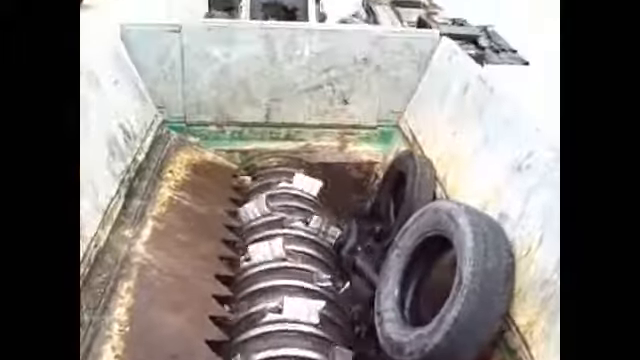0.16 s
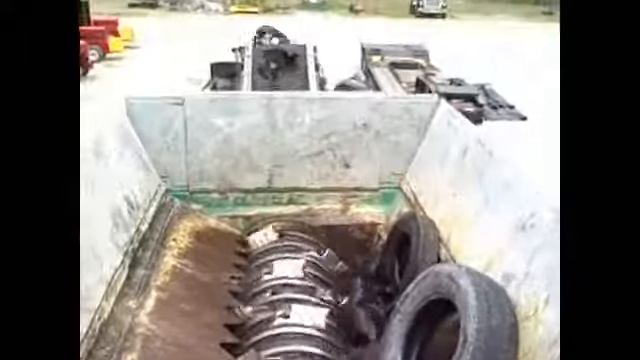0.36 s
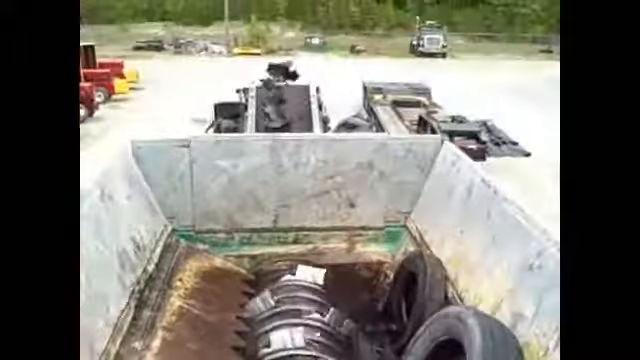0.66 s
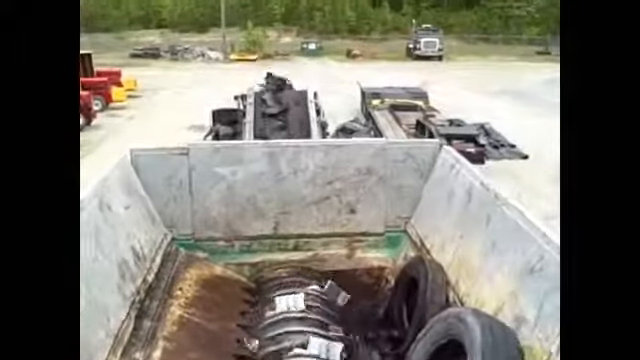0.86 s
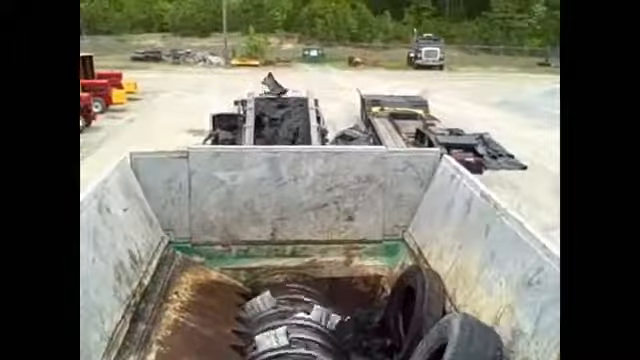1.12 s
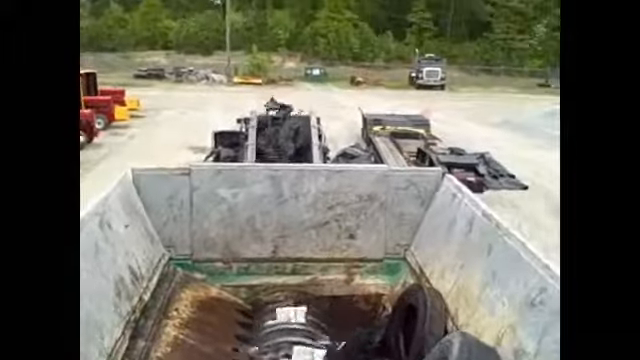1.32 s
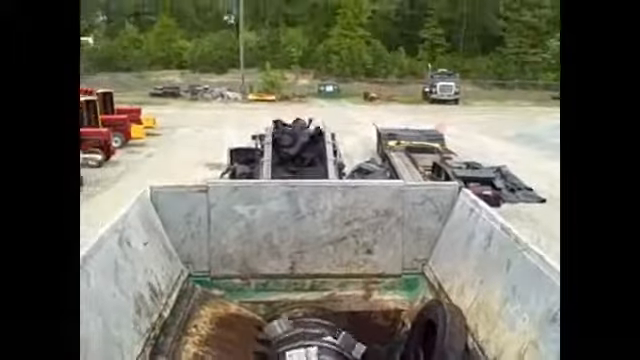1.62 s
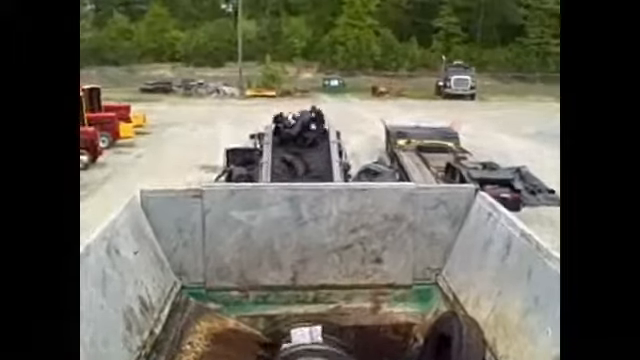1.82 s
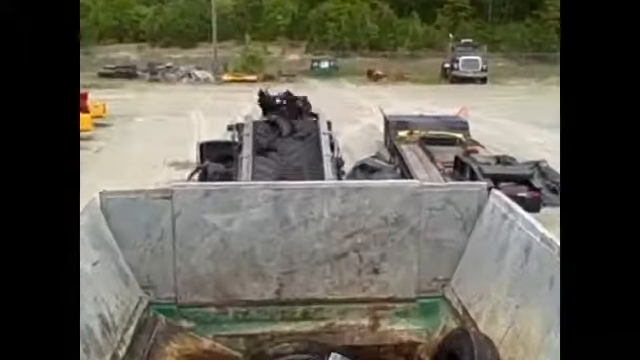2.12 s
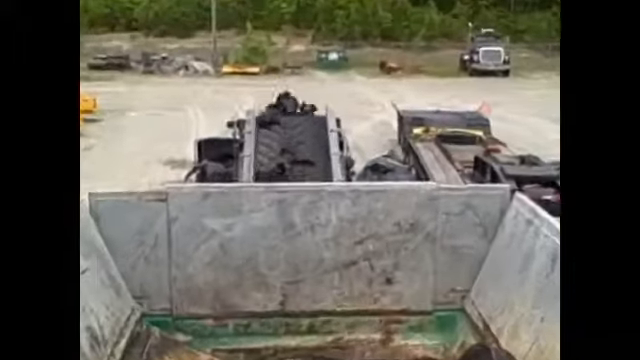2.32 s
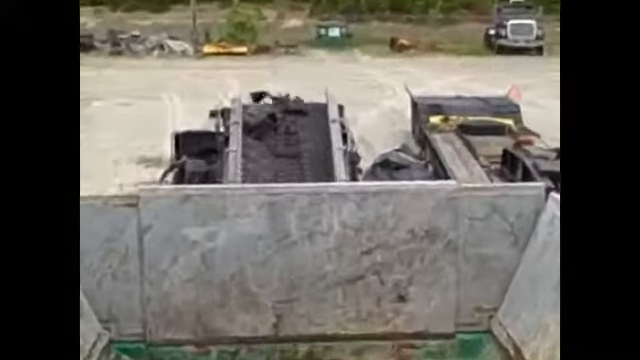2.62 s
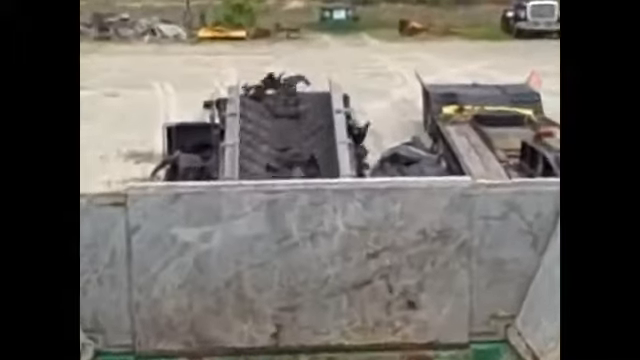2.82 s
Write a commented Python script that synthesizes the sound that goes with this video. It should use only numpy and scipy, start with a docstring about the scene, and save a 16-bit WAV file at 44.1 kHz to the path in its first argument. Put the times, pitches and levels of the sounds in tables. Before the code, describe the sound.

A tyre shredder runs throughout with a low diesel hum, deep rumble, broad fan roar and wavering hydraulic whine. Steel hopper walls knock constantly. Hollow tyre thumps cluster around 0.7 s, recur singly, and thicken at 2.4-2.8 s. Short gritty rubber tears continue, sharper near 1.3 and 2.7 s, with brief squeaks from 1.2 s and wire pings near 2.7 s. Open yard, close mono pickup, slightly overloaded peaks.

```python
"""A low exhaust hum and a broad roar fill an open yard, heard from above a tyre shredder's steel hopper.
The diesel hums on its firing rate, a hydraulic pump whines in two sines, and banded noise makes the
roar of cooling fan and drive and a deep rumble. Random knocks ring the hopper, tyres thump in dying tones
with noise, rubber squeaks and wire pings in narrow noise, and teeth tear rubber in bursts of grit and hiss."""
import sys
import numpy as np
from scipy import signal
from scipy.io import wavfile

SR = 44100
rng = np.random.default_rng(int(sys.argv[2]) if len(sys.argv) > 2 else 0)


def wav_out(sig):
    """Save sig, one row per channel (or a flat mono array), as 16-bit PCM at SR to the path in sys.argv[1]."""
    wavfile.write(sys.argv[1], SR, np.round(np.clip(np.atleast_2d(sig).T, -1, 1) * 32767).astype(np.int16))


N = 130977


def amp(db):
    """Amplitude factor of a level in dB."""
    return 10 ** (np.asarray(db) / 20)


def rms_one(x):
    """Scale a signal to rms 1."""
    return x / np.sqrt(np.mean(x ** 2) + 1e-20)


def in_time(rows):
    """Straight lines between (seconds, value) rows, one value per sample."""
    seconds, value = np.transpose(rows)
    return np.interp(np.arange(N) / SR, seconds, value)


def drift(rate_hz):
    """Slow random wander of spread 1: noise through two equal low-pass poles at rate_hz."""
    step = 40   # samples between computed points
    settle = 2000   # points dropped while the filter settles
    pole = np.exp(-2 * np.pi * rate_hz * step / SR)
    noise = rng.standard_normal(N // step + settle + 2)
    slow = signal.lfilter([1], [1, -2 * pole, pole ** 2], noise)[settle:]
    return np.interp(np.arange(N) / step, np.arange(len(slow)), rms_one(slow - slow.mean()))


def band(x, low_hz, high_hz):
    """Keep what lies between two frequencies."""
    return signal.sosfilt(signal.butter(2, [low_hz, high_hz], "band", fs=SR, output="sos"), x)


def tone(phase, db):
    """A sine at the given rms level, from a random starting phase."""
    return np.sqrt(2) * amp(db) * np.sin(phase + rng.uniform(0, 2 * np.pi))


def grit(rate_per_s, spread_db):
    """Random clicks of uneven size and either sign."""
    size = amp(spread_db * np.minimum(rng.exponential(1, N), 5)) * rng.choice([-1, 1], N)
    return size * (rng.random(N) < rate_per_s / SR)


def banded_noise(spectrum, patchy_db, treble_db=0):
    """Third-octave bands of noise that flicker partly together and partly alone; rms 1."""
    together_share, treble_from_hz = .4, 300
    hz_at, db_at = np.transpose(spectrum)
    octaves = np.log2(hz_at[-1] / hz_at[0])
    edges = hz_at[0] * 2 ** np.arange(0, octaves + .6, 1 / 3)
    together = drift(6.3)
    white = rng.standard_normal((2, N))
    out = 0
    for k, (low, high) in enumerate(zip(edges, edges[1:])):
        hz = np.sqrt(low * high)
        flicker = patchy_db * (together_share * together + drift(13.8))
        db = np.interp(np.log(hz), np.log(hz_at), db_at) + flicker
        db = db + treble_db * hz / (hz + treble_from_hz)   # acts more the higher the band
        out = out + amp(db) * band(white[k % 2], low, high)   # neighbours use separate noises
    return rms_one(out)


def rumble():
    """Deep rumble: low noise whose bands flicker in level."""
    # Each row: frequency in Hz, relative level in dB per Hz.
    spectrum = [(15, -34), (30, 5), (50, 11.5), (80, 2), (125, -14.5), (180, -10)]
    return amp(-33.5) * banded_noise(spectrum, patchy_db=2.0)


def roar():
    """Cooling fan and drive: broad noise whose treble follows the load."""
    # Each row: frequency in Hz, relative level in dB per Hz.
    spectrum = [(74, -8), (125, -5.5), (156, -13), (223, -7), (283, -7), (346, -8), (406, -10), (581, -17),
                (655, -16), (709, -9), (783, -15.5), (1140, -22.5), (1260, -22.5), (1640, -26),
                (2700, -29.5), (7310, -45.5), (14700, -50.5)]
    # Treble of the roar. Each row: time in seconds, level in dB (only departures from the mean count).
    load_rows = [(0, -39.5), (.2, -39.5), (.45, -41), (.65, -38.5), (.9, -41), (1.2, -41.5), (1.35, -39.5),
                 (1.52, -41.5), (1.75, -40), (1.95, -41.5), (2.1, -40.5), (2.22, -42), (2.38, -40),
                 (2.55, -40), (2.65, -40.5), (2.8, -40.5), (2.97, -38.5)]
    load = in_time(load_rows)
    return amp(-22) * banded_noise(spectrum, patchy_db=1.34, treble_db=load - load.mean())


def engine():
    """Exhaust pulses: a sine at the wandering firing rate, and weaker sines at half-order multiples."""
    firing_hz, wander_hz = 104.44, 0.44
    # Exhaust hum. Each row: time in seconds, level in dB before a small random waver.
    hum_rows = [(0.0, -20), (0.22, -17.5), (0.55, -22.5), (0.71, -16), (0.93, -21), (1.1, -18.5),
                (1.67, -20), (1.73, -18), (2.41, -19.5), (2.49, -15), (2.64, -20.5), (2.97, -17.5)]
    # Weaker orders. Each row: multiple of the firing rate, level in dB before a random waver.
    order_rows = [(.5, -46.5), (1.5, -36)]
    phase = 2 * np.pi * np.cumsum(firing_hz + wander_hz * drift(2.1)) / SR
    out = tone(phase, in_time(hum_rows) + 1.04 * drift(36))
    for multiple, db in order_rows:
        out = out + tone(multiple * phase, db + 3.6 * drift(5.3))
    return out


def pump():
    """Piston ripple of the hydraulic pump: two partials, an octave apart, on one wandering speed."""
    wander_hz, low_db = 1.0, -33
    # Each row: time in seconds, pitch of the second partial in Hz before the wander.
    speed_rows = [(0, 722), (.1, 724), (.26, 704), (.45, 724), (.6, 722), (.77, 706), (.95, 728),
                  (1.05, 726), (1.17, 706), (1.35, 720), (1.56, 728), (1.78, 706), (1.92, 723), (2.13, 719),
                  (2.22, 710), (2.4, 729), (2.6, 712), (2.8, 729), (2.97, 724)]
    # Each row: time in seconds, level of the second partial in dB.
    whine_rows = [(0.0, -34), (0.34, -36.5), (0.84, -34), (0.88, -42.5), (1.05, -28), (1.25, -36),
                  (1.31, -31), (1.93, -32), (2.13, -28), (2.17, -39.5), (2.56, -31), (2.77, -49),
                  (2.8, -34), (2.97, -35)]
    phase = 2 * np.pi * np.cumsum(in_time(speed_rows) + wander_hz * drift(20)) / SR
    low_partial = tone(phase / 2, low_db + 1.4 * drift(8.8))
    return low_partial + tone(phase, in_time(whine_rows))


def hopper():
    """Tumbling tyres and the rotor knock the steel walls throughout: random clicks ring dying modes."""
    knocks = grit(rate_per_s=70, spread_db=3.2)
    # Wall modes. Each row: frequency in Hz, relative level in dB, time to fall 60 dB in seconds.
    modes = [(182, 6.5, 0.077), (282, 1, 0.13), (318.5, 2, 0.093), (430, -25.5, 0.071), (516, -6.5, 0.15),
             (1273, -12.5, 0.12)]
    out = 0
    for hz, db, t60 in modes:
        radius, angle = amp(-60 / (t60 * SR)), 2 * np.pi * hz / SR
        strikes = knocks * rng.standard_normal(N)   # each knock excites each mode differently
        ringing = signal.lfilter([0, np.sin(angle)], [1, -2 * radius * np.cos(angle), radius ** 2], strikes)
        out = out + amp(db) * ringing
    return amp(-28) * rms_one(out)


def squeaks():
    """Short squeaks of rubber and pings of wire: narrow noise under a smooth swell."""
    # Each row: start in seconds, rms level at the top of the swell in dB, pitch in Hz, length in seconds.
    squeak_rows = [(1.237, -30, 1530, 0.047), (1.312, -28, 1800, 0.0098), (1.585, -34, 1900, .03),
                   (2.319, -35, 2700, 0.015), (2.691, -22.5, 4620, 0.0046), (2.692, -30, 6160, 0.0044),
                   (2.736, -36, 5100, 0.02), (2.773, -33, 3260, 0.011)]
    out = np.zeros(N)
    for start, db, hz, length in squeak_rows:
        n, first = int(length * SR), int(start * SR)
        rough = rms_one(band(rng.standard_normal(SR // 8), hz * .96, hz * 1.04))
        out[first:first + n] += amp(db) * np.hanning(n) * rough[-n:]
    return out


def thumps():
    """Tyres thump against walls and rotor: hollow booms, each a dying tone with noise around it."""
    attack_s, width = 0.0024, 0.43   # width of the noise as a share of the pitch
    # Each row: start in seconds, level in dB (5 dB is taken off), pitch in Hz, time to fall 60 dB in seconds.
    thump_rows = [(.217, -16, 282, .08), (.342, -18.5, 301, .19), (.573, -18.5, 306, 0.15),
                  (.66, -12, 160, 0.13), (.668, -21, 422, 0.093), (.705, -7, 382, 0.091),
                  (.71, -7.5, 179, 0.23), (.721, -15.5, 314, 0.15), (.735, -15.5, 822, 0.095),
                  (1.01, -13.5, 261, .15), (1.336, -15, 336, 0.15), (1.679, -11, 189, 0.12),
                  (1.932, -8, 314, 0.096), (2.155, -12, 200, .08), (2.388, -12, 180, 0.16),
                  (2.431, -7, 185, .11), (2.45, -11, 300, 0.11), (2.489, -10.5, 293, 0.11),
                  (2.529, -7.5, 280, 0.1), (2.599, -15, 297, .12), (2.73, -8.5, 148, 0.21),
                  (2.804, -10.5, 309, 0.17)]
    t = np.arange(SR // 3) / SR
    out = np.zeros(N + SR)
    for start, db, hz, t60 in thump_rows:
        noise = band(rng.standard_normal(len(t)), hz / (1 + width), hz * (1 + 2 * width))
        body = np.sin(2 * np.pi * hz * t) + .5 * rms_one(noise)
        shape = (1 - np.exp(-t / attack_s)) * amp(-60 * t / t60)
        first = int(start * SR)
        out[first:first + len(t)] += amp(db - 5) * body * shape / shape.max()
    return out[:N]


def tearing():
    """Teeth tear rubber: swells of snapping grit and hiss, each coloured in three bands."""
    attack_s, crest_db = .005, 14
    grit_share = .4   # share of the power that is snaps; the rest is smooth noise
    # Each row: start in seconds, rasp level in dB (the crest is taken off), crunch in dB over the rasp,
    # hiss in dB over the rasp, decay time constant in seconds.
    tear_rows = [(0.222, -30.5, 11, -5, 0.025), (0.2897, -30.5, 14, -11, 0.027),
                 (0.3434, -31.5, 10, -10, 0.013), (0.5794, -30.5, 5, -3, 0.026),
                 (0.6174, -29, 12.5, -4, 0.018), (0.6575, -25, 12.5, -7, 0.012),
                 (0.6944, -30.5, 15, -6, 0.015), (0.7124, -29.5, 17, -2, 0.011),
                 (0.7337, -28, 16, -6, 0.0076), (0.808, -31, 14, -8, 0.014),
                 (0.8649, -32.5, 17.5, -10, 0.006), (1.0585, -26.5, 12, -9, 0.028),
                 (1.1594, -31, 8, -8, 0.011), (1.3124, -27.5, 13, -13, 0.012), (1.337, -21, 9, -6, 0.013),
                 (1.355, -28.5, 11.5, -5, 0.028), (1.4064, -27, 10, -7, 0.03),
                 (1.5768, -32.5, 14.5, -8, 0.018), (1.603, -30.5, 16, -10, 0.014),
                 (1.68, -27, 6.5, -8, 0.023), (1.78, -31, 4, -11, 0.0082), (1.8794, -28, -5, -6, 0.015),
                 (1.9284, -28.5, 13.5, -3, 0.015), (2.0075, -26, 8, -14, 0.017),
                 (2.0444, -30, 8, -5, 0.012), (2.13, -29, 12, -6, 0.018), (2.2563, -33, 7.5, -6, 0.013),
                 (2.3133, -28, 10.5, -2, 0.018), (2.4303, -28, 12.5, -13, 0.019), (2.49, -26, 9, -8, 0.043),
                 (2.5296, -25, 9, -11, 0.013), (2.672, -20, 5.5, -10, 0.014), (2.6904, -17, 6, -12, 0.0063),
                 (2.7094, -36, 22.5, -8, 0.015), (2.7751, -43, 3, -11, 0.0066),
                 (2.8394, -31, 13, -14, 0.016), (2.9003, -23, 9.5, -10, 0.017)]
    # Crunch, rasp and hiss in turn. Each row: low edge in Hz, high edge in Hz.
    colours = [(600, 2500), (2500, 6000), (5500, 12000)]
    snaps = rms_one(grit(rate_per_s=5000, spread_db=2.5)) * rng.choice([-1, 1], (3, N))
    smooth = rng.standard_normal((3, N))
    texture = np.sqrt(grit_share) * snaps + np.sqrt(1 - grit_share) * smooth

    t = np.arange(SR // 4) / SR
    power = np.zeros((3, N + SR))   # overlapping tears add in power
    for start, db, crunch_db, hiss_db, decay in tear_rows:
        shape = (1 - np.exp(-t / attack_s)) * np.exp(-t / decay)
        levels = amp(db - crest_db + np.array([[crunch_db], [0], [hiss_db]]))
        first = int(start * SR)
        power[:, first:first + len(t)] += (levels * shape / shape.max()) ** 2

    out = np.zeros(N)
    for p, x, (low, high) in zip(power, texture, colours):
        out += np.sqrt(p[:N]) * rms_one(band(x, low, high))
    return out


def scene():
    """All sources at the one microphone above the hopper, one channel."""
    background = rumble() + roar() + engine() + pump()
    shredding = hopper() + squeaks() + thumps() + tearing()
    return (background + shredding)[None]


def record(dry):
    """The highest peaks overload and are rounded off; a steep filter cuts the top."""
    clip_at, cutoff_hz = .52, 14980
    held = dry / (1 + np.abs(dry / clip_at) ** 8) ** (1 / 8)
    return signal.sosfilt(signal.ellip(14, .3, 70, cutoff_hz, fs=SR, output="sos"), held)


dry = scene()
out = record(dry)
wav_out(out)
```